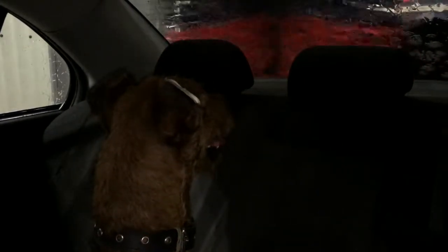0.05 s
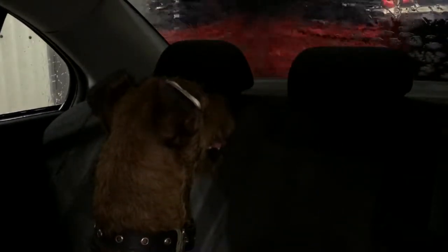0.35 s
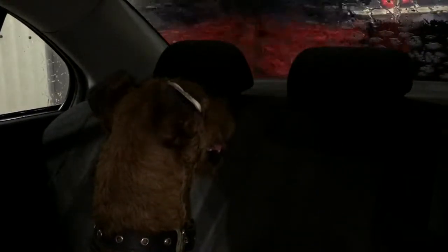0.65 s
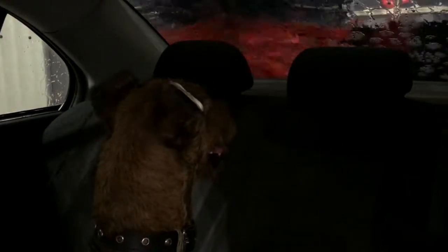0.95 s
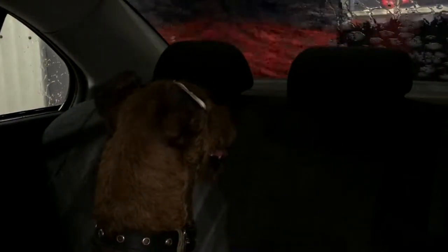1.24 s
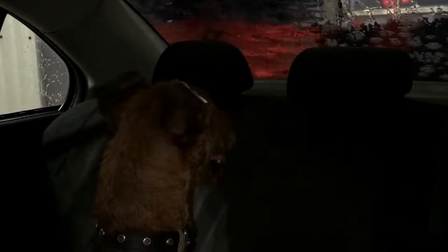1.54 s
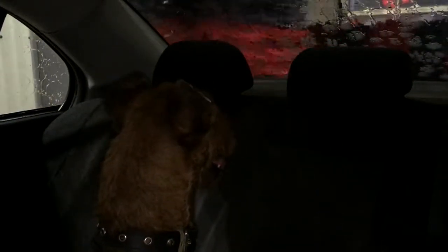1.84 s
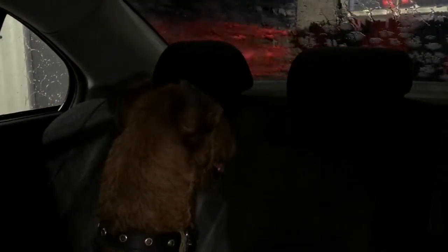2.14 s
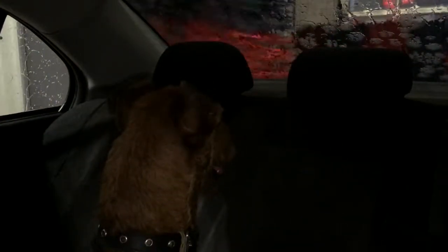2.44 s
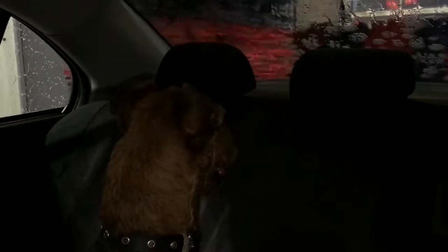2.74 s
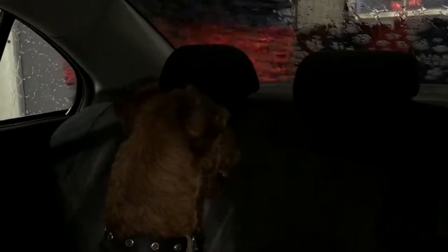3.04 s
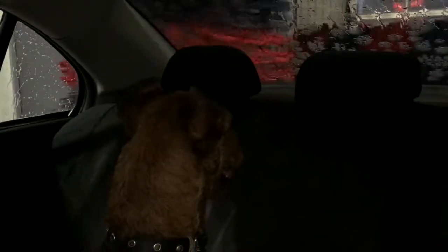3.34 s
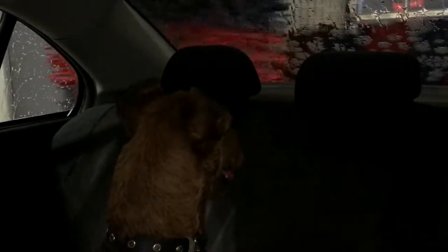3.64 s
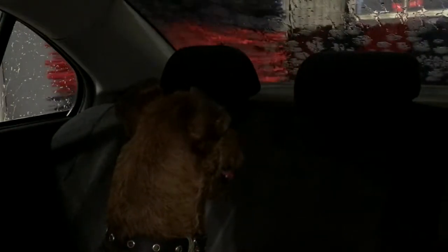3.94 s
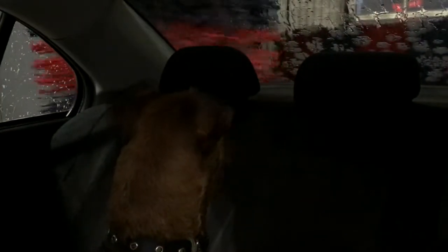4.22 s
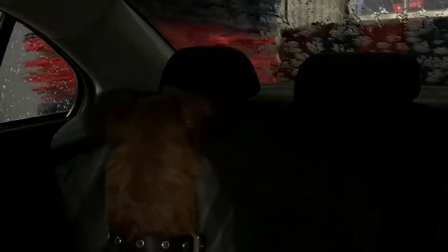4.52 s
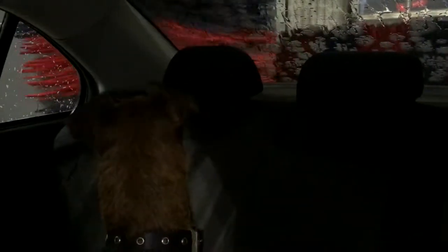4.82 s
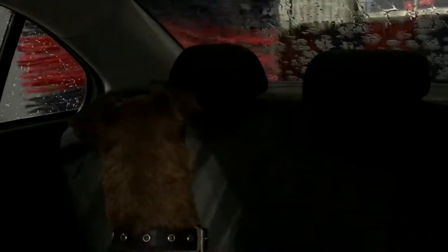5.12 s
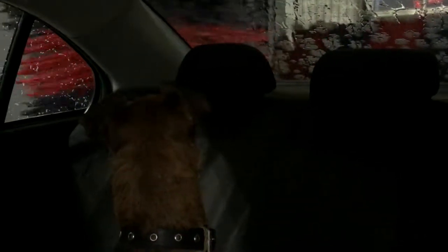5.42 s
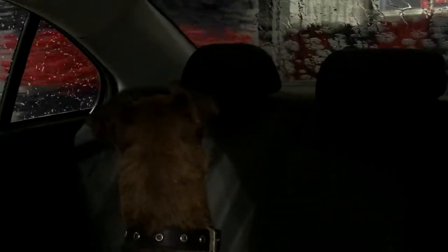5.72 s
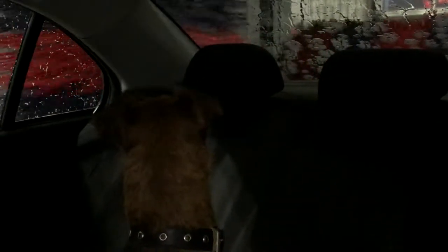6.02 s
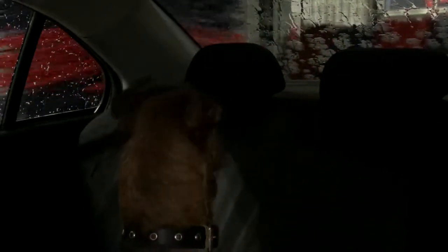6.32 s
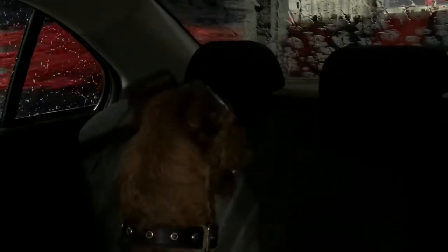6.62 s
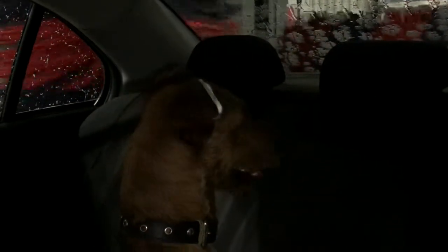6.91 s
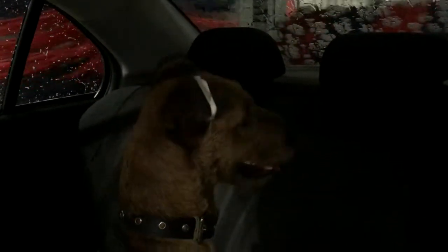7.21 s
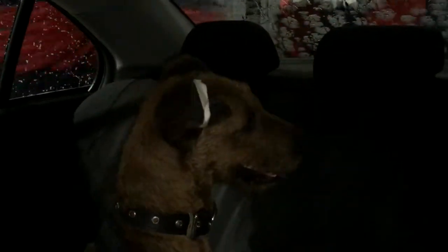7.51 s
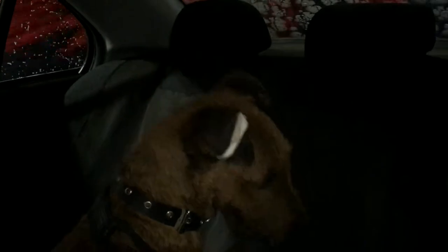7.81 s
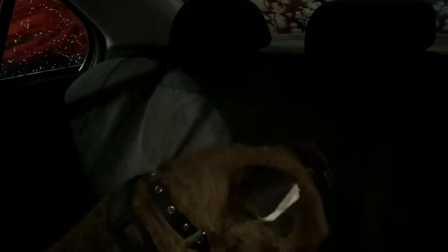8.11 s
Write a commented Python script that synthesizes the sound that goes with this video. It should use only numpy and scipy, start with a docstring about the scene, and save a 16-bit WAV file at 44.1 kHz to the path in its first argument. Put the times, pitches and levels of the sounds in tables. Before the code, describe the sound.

The sound is heard from inside a closed car in a car wash. For the first two seconds a spinning cloth brush beats the rear with a low, quickly pulsing rumble, soft thumps and wet scrubbing, while water hisses and rings faintly on the rear window. From about 2 seconds that brush eases and a side brush creeps up, bringing wet slaps on the door, short splashes and faint squirts through a window seal. From 4 to 6 seconds it is loudest: dense drumming and heavy thumps boom through the cabin, cloth swishes over the paint, and spray hisses in time with the brush. Drops tick sharply on the near window, most thickly between 5 and 6 seconds. After a few hard slaps around 6.2 seconds the side brush slides off. Quieter rear scrubbing, rumble and scattered swishes continue until the end, just past 8 seconds.

```python
"""A spinning cloth wash brush drums along the side of a closed car and leaves, heard from inside.
A second brush works at the rear. Their strips beat the panels, scrub the wet paint and make the cabin
boom. Flung water hisses on the glass in time with the brushes and rings the rear pane; drops tick on
the near window and water squirts through a seal."""
import sys
import numpy as np
from scipy import signal
from scipy.fft import rfft, irfft
from scipy.io import wavfile
from scipy.ndimage import uniform_filter1d

SR = 44100
rng = np.random.default_rng(int(sys.argv[2]) if len(sys.argv) > 2 else 0)


def master_out(mix):
    """Clip the mix to full scale and print it as 16-bit PCM to the path in sys.argv[1]."""
    frames = np.transpose(np.atleast_2d(mix))
    ceiling = np.clip(frames, -1, 1)
    pcm = np.round(ceiling * 32767).astype(np.int16)
    wavfile.write(sys.argv[1], SR, pcm)


N = 364266
TIME = np.arange(N) / SR


def from_db(db):
    """Decibels to gain."""
    return 10 ** (np.asarray(db) / 20)


def sum_db(a_db, b_db):
    """Power sum of two unrelated sounds."""
    return 10 * np.log10(from_db(a_db) ** 2 + from_db(b_db) ** 2)


def unit_rms(x):
    """Scale to rms 1."""
    return x / np.sqrt(np.mean(x ** 2) + 1e-20)


def curves(rows):
    """Each column after time_s, interpolated to every sample."""
    time_s, *columns = np.transpose(rows)
    return [np.interp(TIME, time_s, column) for column in columns]


def smooth(x, span_s):
    """Moving average, applied twice."""
    size = max(int(span_s * SR), 2)
    return uniform_filter1d(uniform_filter1d(x, size), size)


def wander(span_s):
    """Smooth random swing, rms 1."""
    return unit_rms(smooth(rng.standard_normal(N), span_s))


def steady(x, span_s):
    """Hold the power near 1 over span_s, keeping the faster grain."""
    power = np.maximum(smooth(x ** 2, span_s), 0)
    return x / np.sqrt(power + 1e-4 * np.mean(x ** 2))


def through(x, tone, size=8192):
    """Minimum-phase body filter; falls 30 dB per octave beyond the ends of its tone table."""
    hz, db = np.transpose(tone)
    octave = np.log2(np.maximum(np.fft.rfftfreq(size, 1 / SR), 1))
    beyond = np.abs(octave - np.clip(octave, np.log2(hz[0]), np.log2(hz[-1])))
    gain = from_db(np.interp(octave, np.log2(hz), db) - 30 * np.minimum(beyond, 3))
    cepstrum = irfft(np.log(gain))
    cepstrum[1:size // 2] *= 2
    cepstrum[size // 2 + 1:] = 0
    impulse = irfft(np.exp(rfft(cepstrum)))
    return signal.fftconvolve(x, impulse)[:N]


def resonance(x, hz, width_hz):
    """Two-pole resonance, peak gain 1."""
    r = np.exp(-np.pi * width_hz / SR)
    gain = (1 - r * r) / 2
    return signal.lfilter([gain, 0, -gain], [1, -2 * r * np.cos(2 * np.pi * hz / SR), r * r], x)


def impacts(per_s, spread_db):
    """Randomly timed clicks of uneven strength."""
    sizes = from_db(spread_db * np.clip(rng.standard_normal(N), -2, 2)) * rng.choice([-1, 1], N)
    return sizes * (rng.random(N) < per_s / SR) + 1e-18


def place(out, hit, start_s, peak_db):
    """Add a hit to out, scaled to peak_db."""
    at = round(start_s * SR)
    out[at:at + len(hit)] += from_db(peak_db) * hit[:N - at] / np.abs(hit).max()


def bursts(events, tone, rise_s, decay_s, spread_db, ring_db, width_ratio, size=4096):
    """Short patters of uneven contacts through a body, each ringing round its own pitch."""
    out, age_s = np.zeros(N), np.arange(size) / SR
    body = through(np.ones(1), tone)[:size]
    envelope = np.exp(-age_s / decay_s) * (1 - np.exp(-age_s / rise_s))
    for start_s, peak_db, pitch_hz in events:
        patter, force = rng.standard_normal((2, size))
        hit = signal.fftconvolve(patter * from_db(spread_db * force) * envelope, body)[:size]
        ring = from_db(ring_db) * resonance(hit, pitch_hz, width_ratio * pitch_hz)
        place(out, hit + ring, start_s, peak_db)
    return out


def cabin_echoes(x, t60_s=0.044, echo_db=-12.5, size=4096):
    """Dense early reflections off the windows, soon absorbed by the seats."""
    age_s = np.arange(size) / SR
    tail = rng.standard_normal(size) * from_db(-60 * age_s / t60_s) * (age_s > 0.002)
    echoes = signal.fftconvolve(x, tail / np.linalg.norm(tail))[:N]
    wet = from_db(echo_db)
    return (x + wet * echoes) / np.sqrt(1 + wet ** 2)


def seal_jet(push_db, start_s=3.6, end_s=6.9, fade_db_per_s=20, pitch_hz=5300, width_hz=380):
    """A thin jet sizzles across a window seal, chopped by the side brush."""
    drops = impacts(per_s=820, spread_db=4.5)
    jet = resonance(resonance(drops, pitch_hz, width_hz), pitch_hz, width_hz)
    outside_s = np.abs(TIME - np.clip(TIME, start_s, end_s))
    return unit_rms(jet) * from_db(-74 - fade_db_per_s * outside_s + push_db)


# Seal squirts: start_s, level_db, pitch_hz
SEAL_SQUIRTS = [(2.1, -53, 5330), (2.318, -50, 5400), (2.42, -53, 5400), (3.09, -50, 5350),
                (3.45, -59, 5450), (3.53, -51, 5460)]
# Squirt spectrum: freq_hz, gain_db
SEAL_TONE = [(3500, 5), (5400, -5), (7000, -8)]


def squirts():
    """Water squirts through the window seal with a short whistle."""
    return bursts(SEAL_SQUIRTS, SEAL_TONE, rise_s=0.012, decay_s=0.013,
                  spread_db=7, ring_db=16, width_ratio=0.025)


# Spectrum of the crackle and the drop ticks: freq_hz, gain_db
TICK_TONE = [(1500, -12), (4000, 9), (6000, -0.5), (8500, -7), (10400, -11), (11800, -14), (14000, -8),
             (16000, -13)]
TICK_RANGE_HZ = (5000, 14000)


def high_crackle(level_db, per_s=200, bands=16):
    """Fine, speckled high crackle in narrow bands from 5 to 14 kHz."""
    speckle = sum(resonance(impacts(per_s / bands, spread_db=4), hz, width_hz=260)
                  for hz in np.geomspace(*TICK_RANGE_HZ, bands))
    return unit_rms(through(speckle, TICK_TONE)) * from_db(level_db)


def small_drops(spray_db, per_s=11, offset_db=-3.5, spread_db=2):
    """Small drops spatter the window at random, louder in thicker spray."""
    lands = rng.random(N) < per_s / SR
    peak_db = spray_db + offset_db + spread_db * np.clip(rng.standard_normal(N), -2, 2)
    pitch_hz = rng.uniform(*TICK_RANGE_HZ, N)
    events = zip(TIME[lands], peak_db[lands], pitch_hz[lands])
    return bursts(events, TICK_TONE, rise_s=0.003, decay_s=0.006,
                  spread_db=1, ring_db=12, width_ratio=0.1)


# Biggest drops: start_s, level_db, pitch_hz
BIG_DROPS = [(0.2374, -56, 12500), (0.425, -58, 11000), (0.775, -63, 12500), (1.4641, -56, 12000),
             (1.8307, -63, 9000), (2.0048, -63, 11500), (2.2692, -60, 13000), (2.508, -53, 12500),
             (3.009, -48, 8000), (3.0649, -54, 12000), (3.4857, -56, 12000), (3.556, -46, 9000),
             (3.8639, -55, 12600), (4.3213, -52, 11900), (4.4011, -50, 12900), (5.1716, -43, 12000),
             (5.2599, -40.5, 12000), (5.3388, -44, 9000), (5.425, -43, 12000), (5.6032, -38, 12000),
             (5.679, -42, 5500), (5.745, -33, 12450), (5.7872, -47, 12400), (5.8551, -45, 12500),
             (5.8684, -42, 12500), (5.888, -41, 8100), (5.911, -40, 6000), (5.926, -45, 12500),
             (5.9524, -47, 12000), (6.0267, -50, 9060), (6.0766, -45, 12000), (6.1654, -50, 8500),
             (6.3126, -56, 12500), (6.3799, -55, 12500), (6.4642, -63, 12000), (7.0828, -62, 12000),
             (7.1596, -54, 9000), (7.3108, -51, 12000), (7.5862, -61, 12000), (8.0312, -57, 12500)]


def big_drops():
    """Single drops tick against the near window."""
    return bursts(BIG_DROPS, TICK_TONE, rise_s=0.003, decay_s=0.005,
                  spread_db=2, ring_db=9, width_ratio=0.36)


# Sheets of water: start_s, level_db, pitch_hz
WATER_SHEETS = [(2.4894, -44.5, 4000), (3.0112, -44, 4200), (3.3697, -46, 3800), (3.5564, -42, 3800),
                (5.2594, -44, 4000), (5.746, -49, 4000)]
# Splash spectrum: freq_hz, gain_db
SHEET_TONE = [(700, 1), (1500, 5), (2500, 10), (4200, 7), (5600, 0), (8000, -16), (12000, -22)]


def splashes():
    """Sheets of water splash across the glass."""
    return bursts(WATER_SHEETS, SHEET_TONE, rise_s=0.0079, decay_s=0.019,
                  spread_db=2, ring_db=6, width_ratio=0.43)


# Spray through the glass: freq_hz, gain_db
GLASS_TONE = [(1030, -23.5), (1750, -7.5), (1950, 0), (2140, -3), (2840, -4.5), (3910, -2.5), (4410, -3.5),
              (4920, -10.5), (5490, -10.5), (7620, -21.5), (9150, -21), (10400, -28), (11500, -24.5),
              (13900, -29), (15600, -34)]


def spray(level_db):
    """Flung mist and coarser drops hiss on the glass in uneven gushes."""
    drops = unit_rms(impacts(per_s=2600, spread_db=6.5))
    mist = from_db(5.5) * rng.standard_normal(N)
    hiss = unit_rms(through(drops + mist, GLASS_TONE))
    return hiss * from_db(level_db + 1.54 * wander(span_s=0.011))


# Rear pane bending modes: pitch_hz, width_hz, gain_db
PANE_MODES = [(760, 68, 19.5), (1330, 270, 2.5), (1483, 49, 6), (1630, 113, 9), (2234, 94, 4),
              (2410, 55, 6), (2535, 42, 4), (2740, 80, -0.5), (3030, 64, 0.5), (3195, 52, 4),
              (3780, 98, -1.5), (4320, 100, -11)]


def rear_window(water_db, on_pane, off_pane_db=-5.5):
    """Water from the rear brush rings the pane, less as the brush moves off it."""
    water = impacts(per_s=4000, spread_db=3.5)
    ring = sum((-1) ** k * from_db(gain_db) * resonance(water, pitch_hz, width_hz)
               for k, (pitch_hz, width_hz, gain_db) in enumerate(PANE_MODES))
    level_db = -47.5 + 1.6 * water_db + off_pane_db * (1 - on_pane)
    return steady(ring, span_s=0.053) * from_db(level_db)


# Loose cloth strokes: start_s, level_db, pitch_hz
CLOTH_SWISHES = [(2.07, -45, 1300), (4.468, -33, 1400), (5.02, -33, 1500), (5.135, -32.5, 1500),
                 (5.333, -34, 1500), (6.757, -44, 1470), (6.848, -41, 1210), (7.08, -46, 1000),
                 (7.3, -50, 1250), (7.795, -42.5, 1600), (7.883, -38.5, 1070), (7.972, -49, 1060),
                 (8.105, -46, 1130)]
# Swish spectrum: freq_hz, gain_db
PAINT_TONE = [(600, -5), (1000, 1), (1550, -4), (1850, -5.5), (2600, -7), (4200, -9), (6000, -25)]


def swishes():
    """Loose cloth swishes over the paint."""
    return bursts(CLOTH_SWISHES, PAINT_TONE, rise_s=0.012, decay_s=0.019,
                  spread_db=1, ring_db=4, width_ratio=0.34)


# Cloth on the rear pane, the tail and the side: freq_hz, gain_db
PANE_SCRUB_TONE = [(480, -13.5), (600, 0), (650, -3.5), (700, -3), (800, -7.5), (880, 1.5), (1040, -11),
                   (1250, -9), (1380, -12), (1450, -7), (1630, -13), (1760, -23), (2200, -36)]
TAIL_SCRUB_TONE = [(420, -13), (505, 3.5), (560, -6), (620, 1), (700, -4.5), (790, -11.5), (870, -0.5),
                   (1020, -4.5), (1130, -12), (1220, -3), (1320, -11), (1440, -7), (1620, -14.5),
                   (1800, -18), (2150, -20.5), (2600, -30)]
SIDE_SCRUB_TONE = [(480, -10), (600, -1), (690, -1), (800, -7), (890, 1.5), (1020, -6.5), (1250, -6),
                   (1360, -7), (1440, -8), (1520, -9.5), (1630, -8.5), (1760, -19), (2200, -38)]


def scrubbing(rear_db, side_db, on_pane):
    """Wet strip ends flick and drag: evenly on the rear pane, loosely on the tail, and along the side."""
    pane, tail, side = (steady(through(impacts(per_s=2600, spread_db=4), tone), span_s=0.052)
                        for tone in (PANE_SCRUB_TONE, TAIL_SCRUB_TONE, SIDE_SCRUB_TONE))
    slop_db = 1.3 * wander(span_s=0.035)
    tail = tail * from_db(2.5 + slop_db)
    rear = np.sqrt(on_pane) * pane + np.sqrt(1 - on_pane) * tail
    return rear * from_db(-49 + rear_db) + side * from_db(-40.5 + side_db)


# Cabin air response: freq_hz, gain_db
CABIN_TONE = [(12, -66), (20, -20), (32, -14.5), (65, 4.5), (81, 7), (102, -6), (135, -3), (180, -26.5),
              (300, -120)]


def boom(rear_db, side_db):
    """Dull blows flex the body and drive the lowest air modes of the cabin."""
    air = steady(through(impacts(per_s=990, spread_db=2), CABIN_TONE), span_s=0.099)
    bunching_db = 0.87 * wander(span_s=0.042)
    return air * from_db(sum_db(-31 + rear_db, -28 + side_db) + bunching_db)


# Heavy strips on the door: start_s, level_db, pitch_hz
DOOR_SLAPS = [(1.828, -44, 700), (1.912, -41, 587), (2.492, -39, 605), (2.521, -32, 447), (2.669, -33, 413),
              (3.045, -27.5, 388), (3.124, -29.5, 447), (3.562, -24.5, 396), (3.986, -28, 375),
              (4.426, -22, 480), (4.77, -34, 634), (5.685, -28, 584), (6.002, -30, 600), (6.029, -32, 520),
              (6.113, -23, 536), (6.179, -21, 524), (6.279, -20.5, 463), (6.346, -34, 608),
              (6.374, -34, 625), (7.555, -39, 626), (7.654, -38, 552), (7.69, -38, 678), (7.96, -38, 513),
              (8.033, -35, 500)]
# Door skin modes: pitch_ratio, gain_db
DOOR_MODES = [(0.72, -10), (1, 0), (1.36, -6), (1.75, -15)]
# Wet cloth smack: freq_hz, gain_db
SMACK_TONE = [(150, -2), (300, 3), (450, 3), (700, -1.5), (900, -5.5), (1100, -13), (1500, -13.5),
              (2000, -44), (5000, -50)]


def slaps(rise_s=0.002, decay_s=0.017, knock_gain=0.75, size=4096):
    """A heavy wet strip lands flat: the cloth smacks and the door skin knocks."""
    knocks, age_s = np.zeros(N), np.arange(size) / SR
    attack = 1 - np.exp(-age_s / rise_s)
    for start_s, level_db, pitch_hz in DOOR_SLAPS:
        phase = 2 * np.pi * pitch_hz * age_s
        ring = sum(from_db(gain_db) * np.sin(ratio * phase) * np.exp(-ratio * age_s / decay_s)
                   for ratio, gain_db in DOOR_MODES)
        place(knocks, ring * attack, start_s, level_db)
    smacks = bursts(DOOR_SLAPS, SMACK_TONE, rise_s=0.0023, decay_s=0.015,
                    spread_db=1.5, ring_db=-3, width_ratio=0.2)
    return knock_gain * knocks + np.sqrt(1 - knock_gain ** 2) * smacks


# Cloth bunches on the body: start_s, level_db, pitch_hz
PANEL_THUMPS = [(0.223, -25, 69.4), (0.326, -30, 69.5), (0.899, -27.5, 67), (1.04, -27, 77),
                (1.553, -19.5, 95), (3.105, -24.5, 218), (3.119, -27, 78), (3.363, -25.5, 233),
                (3.38, -24.5, 147), (3.593, -27, 96), (3.745, -27, 209), (4.104, -17, 79),
                (4.17, -23, 149.5), (4.248, -21.5, 74), (4.425, -19, 220), (4.521, -14.5, 132),
                (4.53, -21, 342), (4.62, -17.5, 73), (4.688, -21.5, 68.4), (4.735, -20, 326),
                (4.76, -19, 68), (4.976, -19, 218), (5.039, -23, 116), (5.061, -18, 75), (5.246, -18, 212),
                (5.24, -21, 79), (5.27, -21.5, 302), (5.336, -20, 80), (5.428, -19, 320.6),
                (5.503, -19.5, 177), (5.596, -17.5, 209), (5.627, -17.5, 125), (5.697, -18, 80.5),
                (5.754, -19, 158.4), (5.791, -16, 83.3), (5.826, -20.5, 394), (5.845, -20, 136),
                (5.955, -22.5, 98), (6.022, -28, 194), (6.029, -19, 90), (6.135, -23, 123),
                (6.2, -24.5, 259), (6.236, -35, 128), (7.67, -30, 75.5), (7.929, -25, 72)]


def thumps(rise_s=0.009, decay_s=0.028, ruffle_gain=0.7, size=8192):
    """A soft, heavy blow swings one panel briefly, ruffled by the strips that follow."""
    out, age_s = np.zeros(N), np.arange(size) / SR
    envelope = (1 - np.exp(-age_s / rise_s)) * np.exp(-age_s / decay_s)
    for start_s, level_db, pitch_hz in PANEL_THUMPS:
        strips = rng.standard_normal(size)
        width_hz = pitch_hz / 2
        ruffle = unit_rms(resonance(resonance(strips, pitch_hz, width_hz), pitch_hz, width_hz))
        swing = np.sin(2 * np.pi * pitch_hz * age_s)
        place(out, (swing + ruffle_gain * ruffle) * envelope, start_s, level_db)
    return out


# Near door and far panel responses: freq_hz, gain_db
DOOR_TONE = [(71, -28.5), (120, -0.5), (227, 2), (259, -5.5), (301, -3), (351, -8.5), (393, -5),
             (494, -14.5), (584, -14.5), (740, -19), (960, -49), (1630, -120)]
FAR_PANEL_TONE = [(71, -24), (120, -2), (216, -5), (250, -8.5), (286, -5), (348, -15), (385, -10),
                  (440, -17.5), (500, -17.5), (600, -18.5), (740, -28), (960, -40), (1630, -120)]


def drumming(rear_db, side_db):
    """Cloth strips beat the sheet metal in bunches: rear brush far off, side brush on the near door."""
    door = steady(through(impacts(per_s=1000, spread_db=2.5), DOOR_TONE), span_s=0.024)
    far = steady(through(impacts(per_s=1500, spread_db=1), FAR_PANEL_TONE), span_s=0.09)
    panels = far * from_db(-35 + rear_db) + door * from_db(-23.5 + side_db)
    bunching_db = 0.548 * wander(span_s=0.042)
    return panels * from_db(bunching_db)


def brush_push(rate_hz, sweep_at_s, skew=0.052):
    """One swell each time the cloth comes round, rising faster than it falls."""
    angle = 2 * np.pi * rate_hz * (TIME - sweep_at_s)
    return np.cos(angle) - skew * np.sin(2 * angle)


# Rear brush bears on, backs off, returns lighter: time_s, beating_db, rubbing_db, pulse_depth_db
REAR_BRUSH_PATH = [(0, -1.5, 1.5, 1.2), (0.3, 2, -0.5, 1.9), (0.55, 0, -1.5, 2), (1.55, -3, -3, 2.5),
                   (2.2, -9, -9.5, 0.5), (6.68, -11, -6.5, -1.5), (6.82, -10, -4, 0),
                   (7.25, -4, -3.5, -0.2), (7.5, -10, -3, -0.5), (8.26, -6, -2.5, 0.5)]
# Side brush creeps up, bears on the door, slides off: time_s, pressure_db, nearness_db, pulse_depth_db
SIDE_BRUSH_PATH = [(1.3, -17, -21, -2), (1.85, -14.5, -16.5, 1), (2.45, -12, -15.5, 1),
                   (2.85, -12, -18.5, 0.5), (3.1, -8.5, -12.5, 0.5), (3.7, -6, -10.5, 0.5),
                   (3.95, -3, -8, 0.5), (4.3, -3, -5, -0.5), (4.5, -1, -3.5, -1), (5, -1, 0, 0),
                   (5.7, -1.5, -3, 1.5), (5.97, -4, -4.5, 2), (6.25, -8.5, -8.5, 0.2),
                   (6.6, -18.5, -22.5, 0.5), (7.2, -17.5, -33, 1.5), (8.26, -17.5, -42, -1.5)]


def scene():
    """Both brushes pulse the body, cloth and water; the brighter sounds echo in the cabin."""
    beating_db, rubbing_db, rear_depth_db = curves(REAR_BRUSH_PATH)
    pressure_db, nearness_db, side_depth_db = curves(SIDE_BRUSH_PATH)
    on_pane = np.interp(TIME, [2.7, 6.0], [1, 0])  # rear brush moves from pane to tail
    rear_push_db = rear_depth_db * brush_push(rate_hz=11.36, sweep_at_s=0.781)
    side_push_db = side_depth_db * brush_push(rate_hz=11.67, sweep_at_s=5.604)
    rear_beat_db, side_beat_db = 0.63 * rear_push_db, 1.47 * side_push_db
    rear_water_db, side_water_db = rubbing_db + rear_push_db, nearness_db + side_push_db
    spray_db = sum_db(-58.5 + rear_water_db, -46 + side_water_db)
    crackle_db = -69 + sum_db(-20, side_water_db)  # steady floor, swells with the side brush

    body = boom(beating_db, nearness_db) + thumps()
    body += drumming(beating_db + rear_beat_db, pressure_db + side_beat_db) + slaps()
    body += rear_window(rear_water_db, on_pane)
    cloth = scrubbing(rubbing_db + rear_beat_db, 1.38 * pressure_db + side_beat_db, on_pane)
    hiss = spray(spray_db) + seal_jet(side_push_db) + high_crackle(crackle_db)
    water = big_drops() + small_drops(spray_db) + splashes()
    return (body + cabin_echoes(cloth + swishes() + hiss + water + squirts()))[None]


def record(dry, cutoff_hz=15700):
    """Steep low-pass."""
    return signal.sosfilt(signal.ellip(12, 0.1, 90, cutoff_hz, fs=SR, output="sos"), dry)


dry = scene()
out = record(dry)
master_out(out)
```